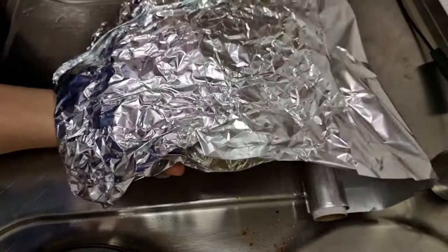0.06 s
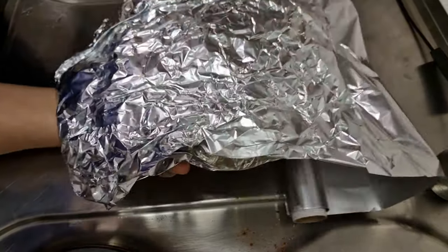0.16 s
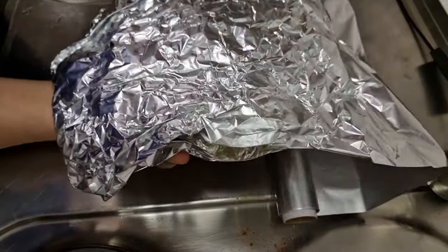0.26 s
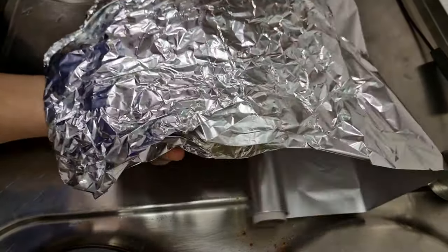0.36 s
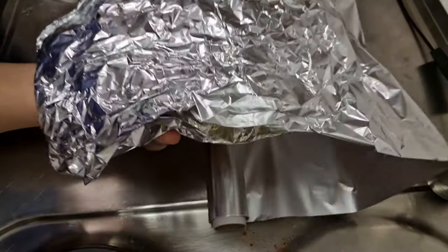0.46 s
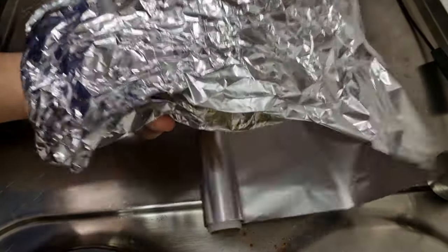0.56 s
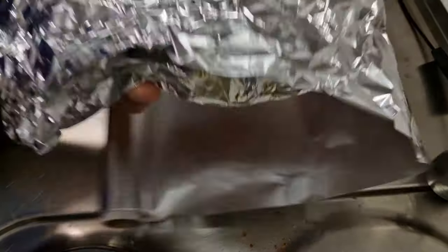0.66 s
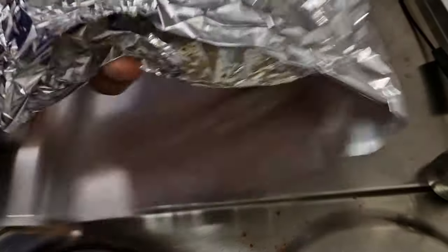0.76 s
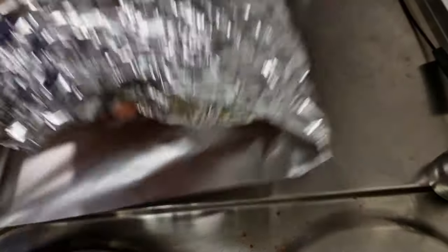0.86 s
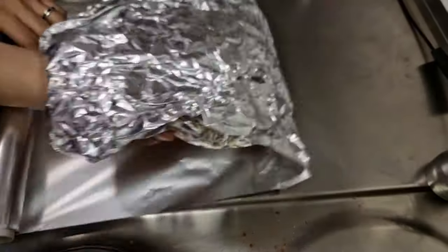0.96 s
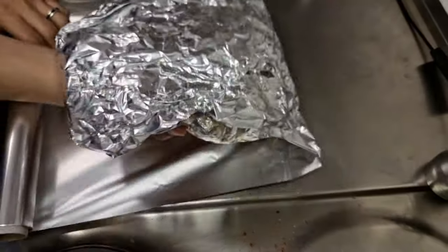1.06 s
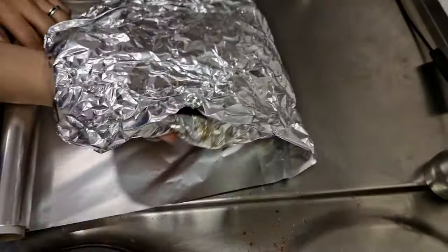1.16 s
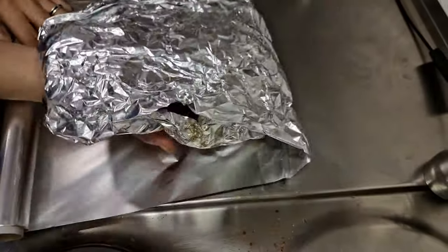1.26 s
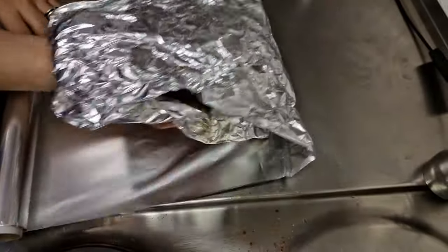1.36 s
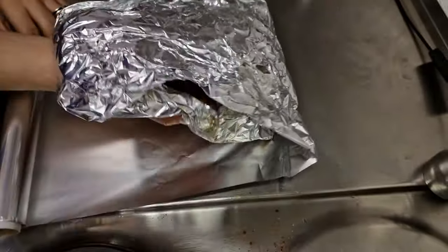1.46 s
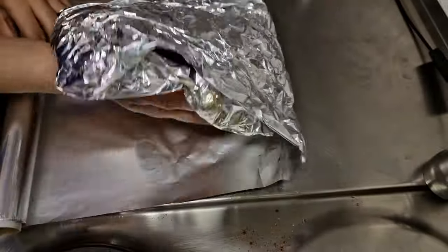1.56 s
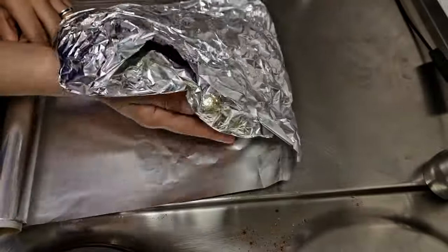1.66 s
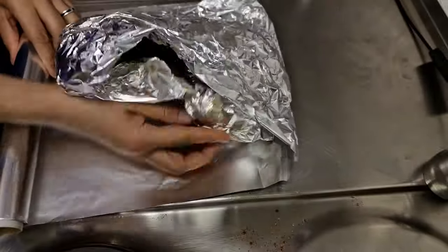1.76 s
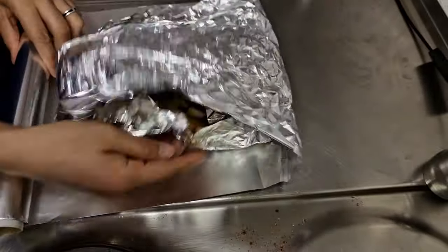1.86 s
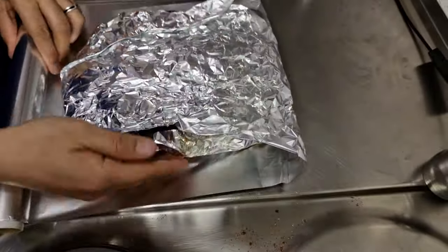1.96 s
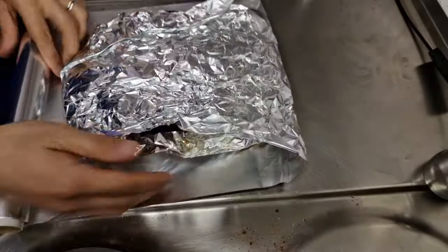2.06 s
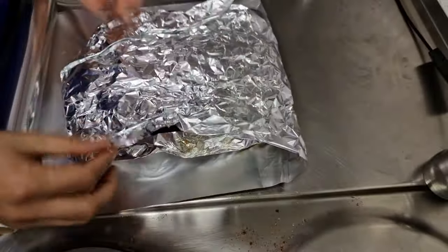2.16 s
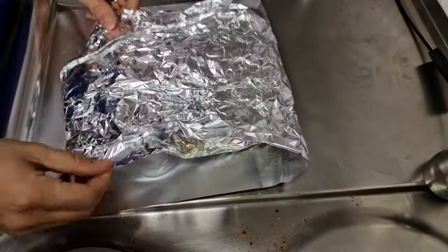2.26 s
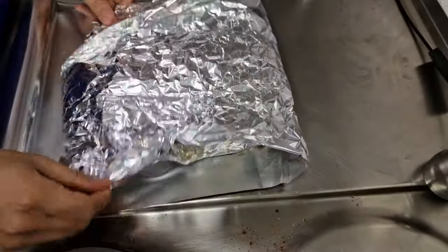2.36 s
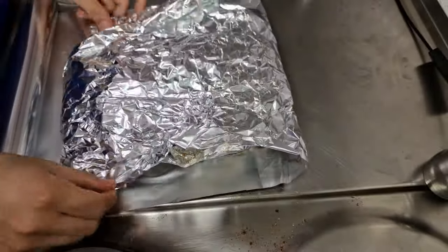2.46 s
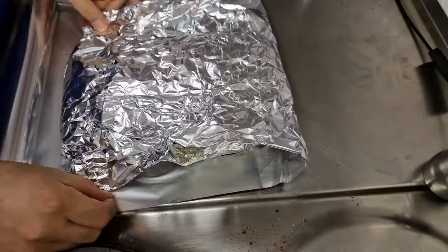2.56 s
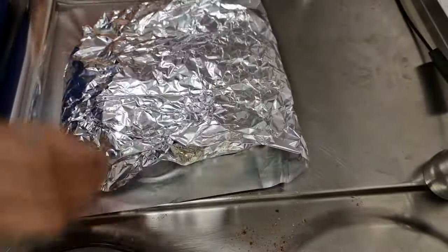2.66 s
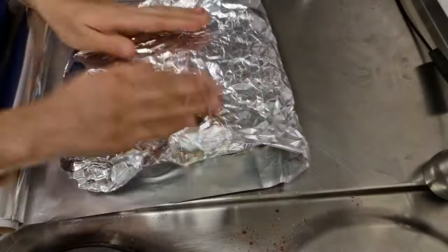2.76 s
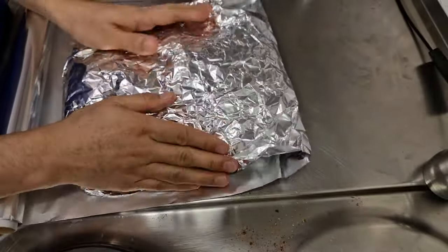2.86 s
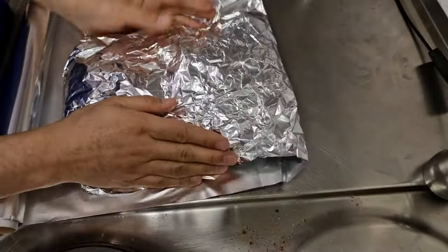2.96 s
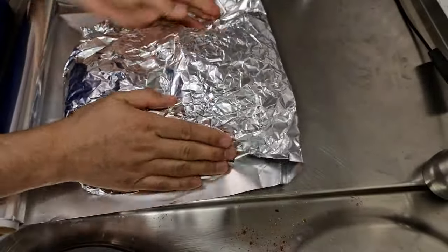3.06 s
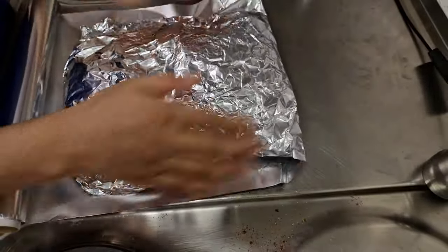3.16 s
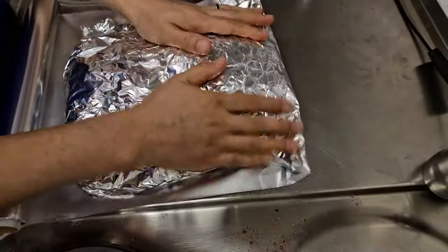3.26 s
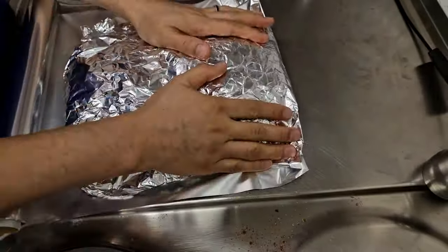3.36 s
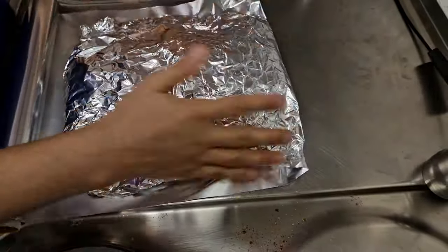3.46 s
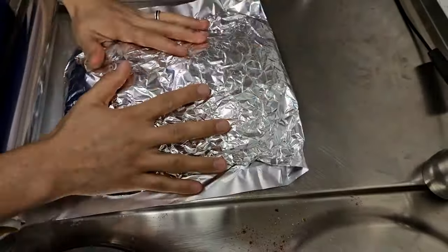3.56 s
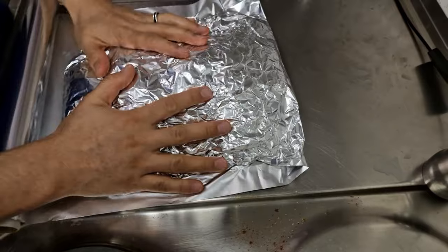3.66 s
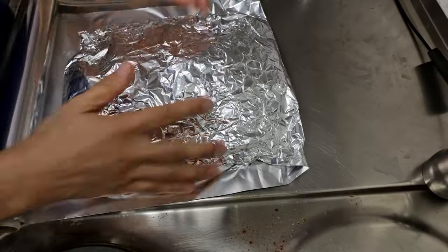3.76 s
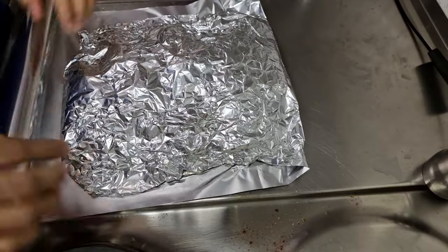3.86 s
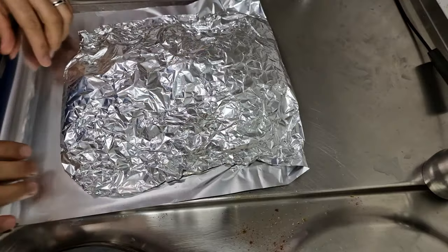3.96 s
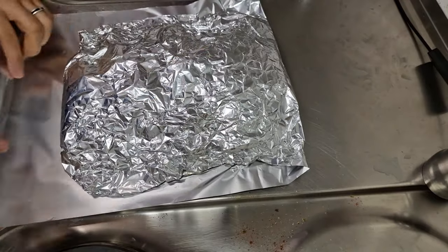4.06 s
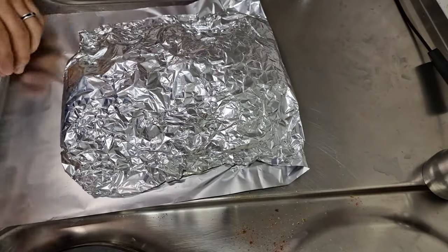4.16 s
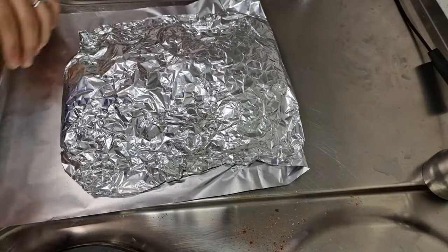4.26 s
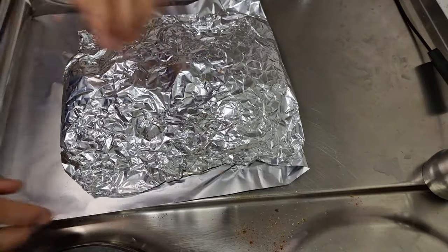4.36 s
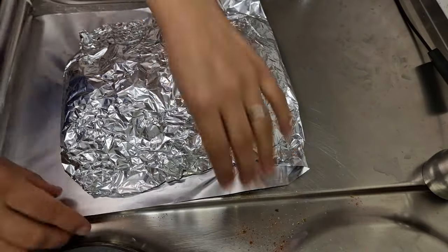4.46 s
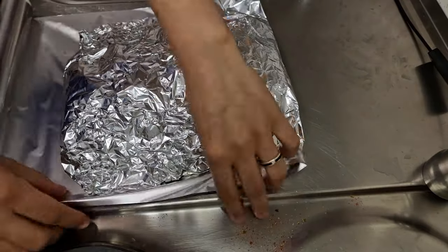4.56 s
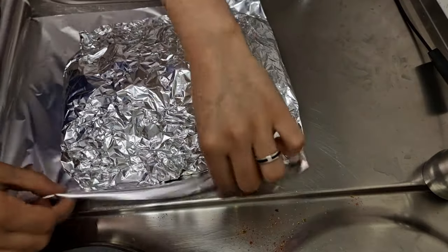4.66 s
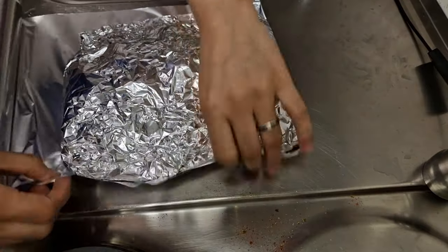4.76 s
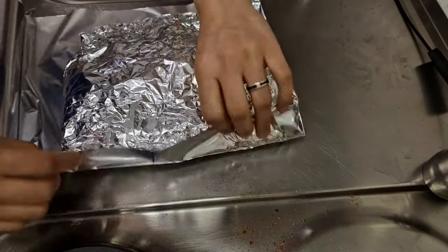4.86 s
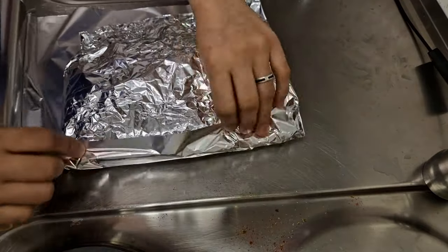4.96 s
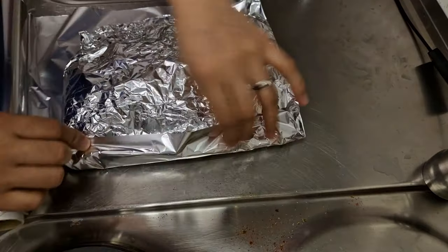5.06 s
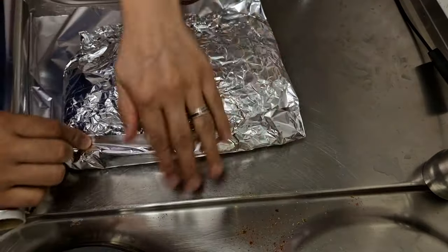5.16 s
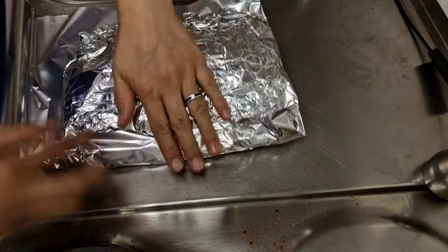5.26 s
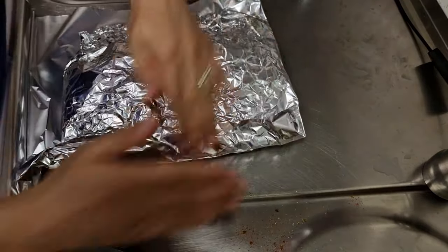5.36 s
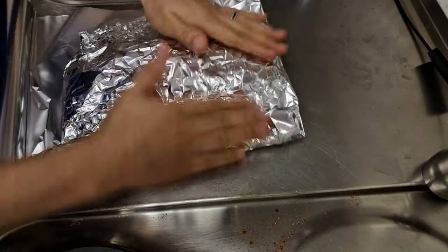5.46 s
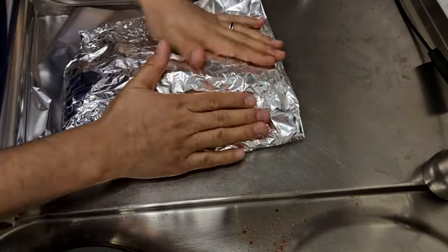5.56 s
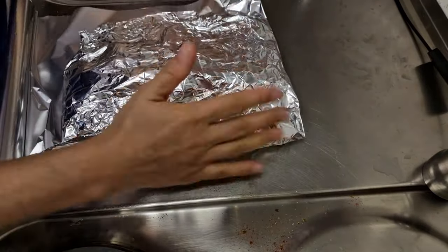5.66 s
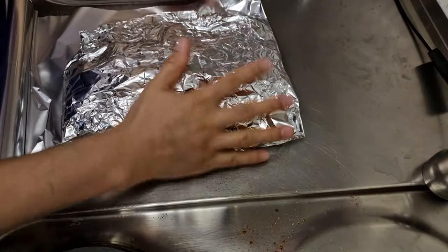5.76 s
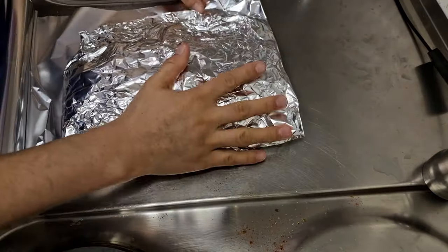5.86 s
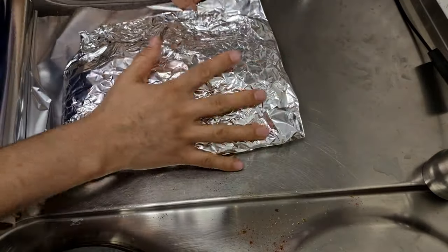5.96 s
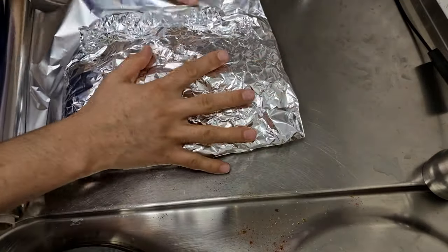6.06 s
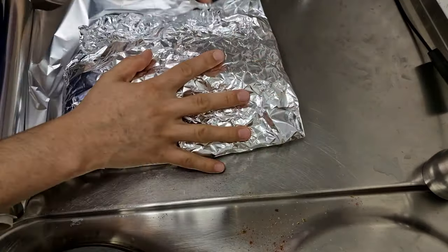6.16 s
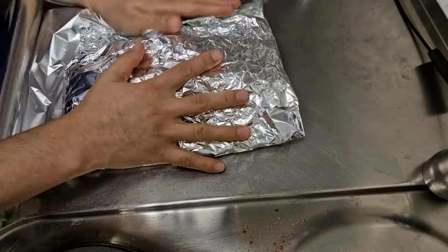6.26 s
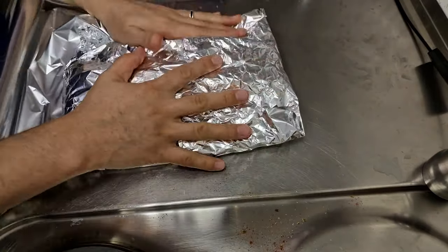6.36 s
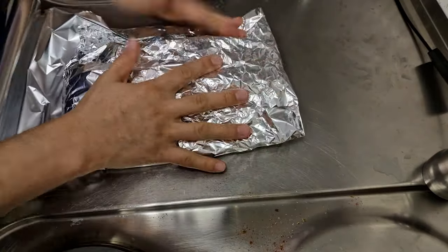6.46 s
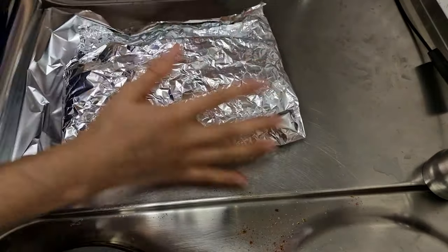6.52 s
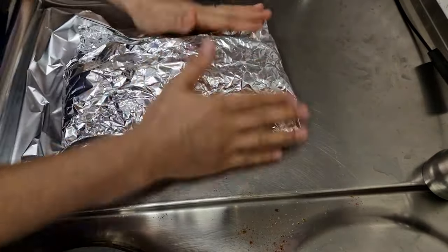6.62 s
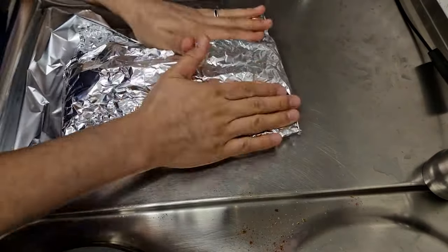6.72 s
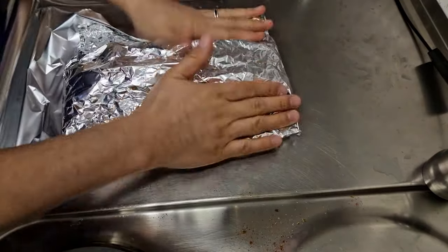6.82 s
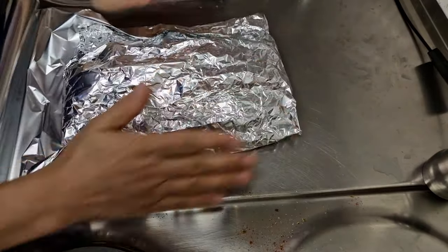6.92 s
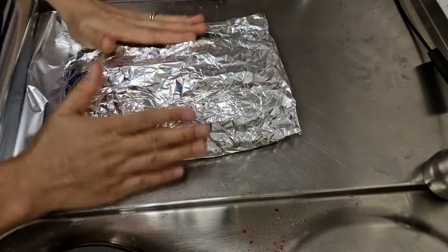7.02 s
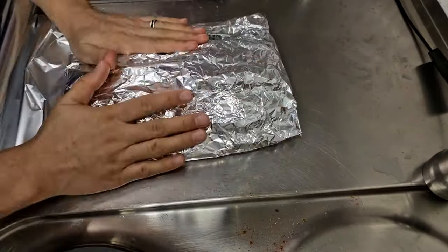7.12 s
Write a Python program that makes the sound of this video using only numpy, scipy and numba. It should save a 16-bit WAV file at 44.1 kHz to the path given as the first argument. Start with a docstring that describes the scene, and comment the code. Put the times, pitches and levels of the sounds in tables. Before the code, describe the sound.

A quiet kitchen, heard close through a phone. From 0 to 0.4 s foil rustles faintly with tiny ticks and a light drag of the roll; from 0.45 s brighter, smoother sheet crackle swells, with a sharp snap near 0.8 s. At about 1 s the parcel lands with a soft low thud on the steel counter. Crinkling continues unevenly, with a strong pop at 1.7 s and duller bumps and scraping around 1.95-2.1 s. Smaller folds follow until 2.6 s, then pressing bursts at 2.8 and 3.3 s, dense and crunchy. From 3.8 to 4.45 s it nearly stops: faint ticks, slight dragging, room hush. At 4.5 s bright smooth folding resumes, snapping rapidly through 5.1 s, with a strong crunch at 5.2 s. Separate pressing bursts of crumpled foil follow from 5.5 s, with clusters at 6.0-6.5 and 6.6-6.9 s, still crackling at the end, around 7 s.

```python
"""Aluminium foil crackles as hands fold and press it round a parcel: swarms of tiny creases snap, each
a short damped vibration, and larger facets buckle in short cascades that ring in the same way.
The parcel and the foil roll knock and drag on a steel kitchen counter, which booms on a few low modes.
Sheet and kitchen smear the sound with dense reflections, over a quiet room hush, close to a phone."""
import sys
import numpy as np
from scipy import signal
from scipy.fft import rfft, irfft
from scipy.io import wavfile
from scipy.ndimage import uniform_filter1d
from numba import njit

SR = 44100
rng = np.random.default_rng(int(sys.argv[2]) if len(sys.argv) > 2 else 0)


def generate_wav(signal):
    """Clip the signal to [-1, 1] and save it as 16-bit WAV at the path in sys.argv[1]."""
    frames = np.transpose(np.atleast_2d(signal))
    scaled = np.clip(frames, -1, 1) * 32767
    pcm = np.round(scaled).astype(np.int16)
    wavfile.write(sys.argv[1], SR, pcm)


def rack_gain(trim_db):
    """Turn a fader trim in dB into the linear factor to multiply a signal by."""
    fader = np.asarray(trim_db, float)
    return 10 ** (fader / 20)


N = 317079  # length in samples


def crackle(spread_db, cycles, surge_db):
    """Crackling noise: a swarm of small snaps, most faint and a few strong, with a level that flickers quickly."""
    # spectrum of the foil's crackle: f/Hz, relative level per Hz/dB
    foil_spectrum = [(120, -28), (250, -24), (500, -13), (1000, -10.5), (2000, -10), (3500, -10),
                     (6000, -5.5), (8500, -12), (13000, -12.5), (16000, -21)]
    snaps_per_s = 12000
    low, high = 2500, 8500  # Hz, limits of folds and of creases
    # relative levels in smooth and in crumpled foil, dB
    fold_db, crease_db = (-19, -2), (3, -15.5)

    when, pitch, strength, sign = rng.random((int(snaps_per_s * N / SR), 4)).T
    hz = 250 * 70 ** pitch ** .6  # fine creases outnumber large folds
    # size rises with pitch so that the swarm is white before the foil colours it
    size = hz * pitch ** -.33
    size = size * rack_gain(-spread_db * np.log(1.003 - strength)) * np.sign(sign - .5)

    hold = SR // 45  # samples per random surge value
    surge = np.repeat(rng.standard_normal(N // hold + 1), hold)
    surge = uniform_filter1d(surge, hold // 2)[:N]
    swarm = snaps(when * N / SR, hz, cycles, size) * rack_gain(surge_db * surge)

    gain, crumpled = hands()
    middle = unit(colour(swarm, foil_spectrum, low, high))
    folds = rack_gain(between(fold_db, crumpled)) * unit(colour(swarm, foil_spectrum, hi_hz=low))
    creases = rack_gain(between(crease_db, crumpled)) * unit(colour(swarm, foil_spectrum, lo_hz=high))
    return gain * (middle + folds + creases)


def snaps(s, hz, cycles, size):
    """Free vibration: creases flip at times s and ring a few cycles at their own pitch."""
    hz = np.clip(hz, 150, .45 * SR)
    start = np.clip(s * SR, 0, N).astype(np.int64)
    t60 = np.maximum(cycles, 1) / hz
    return rings(N, start, hz, t60, size, 1. * SR)


@njit
def rings(n, start, hz, t60, size, sr):
    """Exponential decay: a rotating, shrinking phasor draws each damped sine from its start sample."""
    out = np.zeros(n)
    for k in range(len(start)):
        turn = np.exp(2j * np.pi * hz[k] / sr - np.log(1000) / (t60[k] * sr))
        z = size[k] + 0j
        for i in range(start[k], min(n, start[k] + int(t60[k] * sr))):
            out[i] += z.imag
            z *= turn
    return out


def hands():
    """Driven crumpling: crackle gain and how crumpled the handled foil is, at every sample."""
    # hands pull, fold or press the foil: start t/s, length t/s, relative crackle level at start/dB,
    # relative crackle level at end/dB, crumpled share (0-1)
    presses = [(0, 0.043, -44, -38.5, 0.46), (0.094, 0.046, -49.5, -51.5, 0.6), (.17, 0.1, -53, -53, 0.56),
               (0.296, 0.045, -44.5, -50, 0.2), (0.363, 0.049, -46, -49, 0.5),
               (0.432, .11, -41.5, -42, 0.17), (0.569, 0.083, -36, -37.5, 0.17),
               (0.677, .12, -41, -33, 0.14), (0.812, .1, -34, -44.5, 0.13), (0.936, 0.11, -43, -36.5, 0.18),
               (1.038, 0.17, -40.5, -51.5, 0.4), (1.172, .1, -39, -47, 0.36),
               (1.298, 0.093, -54.5, -36, 0.06), (1.398, .31, -44.5, -42, 0.52),
               (1.714, 0.24, -40.5, -34, 0.61), (1.942, 0.15, -46.5, -48, 0.74),
               (2.176, 0.138, -46.5, -48, .5), (2.333, .13, -40.5, -41.5, .5),
               (2.489, 0.09, -41.5, -45.5, 0.7), (2.605, 0.026, -36, -44.5, 0.44),
               (2.799, 0.095, -30.5, -34.5, 0.66), (2.89, 0.3, -40.5, -43.5, 0.41),
               (3.262, 0.035, -37, -28.5, 0.32), (3.321, 0.073, -39.5, -47, 0.45),
               (3.418, 0.059, -45, -34, 0.4), (3.564, 0.075, -39.5, -40, 0.68),
               (3.65, .07, -48.5, -49, 0.55), (3.729, 0.051, -51.5, -40, 0.58),
               (3.794, .07, -68, -64.5, 0.3), (3.943, 0.11, -70, -72, .5), (4.155, 0.051, -68, -59.5, .6),
               (4.487, .045, -47.5, -54, 0.27), (4.543, 0.073, -37.5, -40.5, 0.07),
               (4.649, .24, -35.5, -38, 0.35), (4.895, .2, -42.5, -40, .5), (5.092, 0.072, -42, -56.5, .5),
               (5.189, 0.088, -31.5, -40, 0.55), (5.276, 0.12, -42, -48.5, 0.43),
               (5.49, 0.08, -32.5, -43, 0.63), (5.554, 0.13, -41, -41.5, 0.59),
               (5.749, 0.072, -42.5, -45, 0.58), (5.853, 0.21, -49, -48, 0.57),
               (6.028, .14, -33.5, -44, 0.65), (6.181, 0.068, -43, -33.5, 0.77),
               (6.265, 0.16, -34, -41.5, 0.81), (6.444, 0.091, -45, -36, 0.7),
               (6.634, 0.16, -40.5, -37.5, 0.54), (6.833, 0.083, -43.5, -45, 0.65),
               (6.989, .17, -36, -36.5, 0.76)]
    t, power = strokes(presses, attack=2498, release=699)
    total = power.sum(axis=0) + 1e-30
    crumpled = np.array(presses)[:, 4] @ power / total  # mean weighted by power
    return [np.interp(np.arange(N) / SR, t, c) for c in (np.sqrt(total), crumpled)]


def strokes(rows, attack, release):
    """Exponential envelopes: power of each stroke rises, runs straight in dB and falls (slopes in dB/s)."""
    t = np.arange(0, N + 64, 64) / SR
    s, length, first_db, last_db = np.transpose(rows)[:4, :, None]
    run = first_db + (last_db - first_db) * np.clip((t - s) / length, 0, 1)
    rise = attack * np.maximum(s - t, 0)
    fall = release * np.maximum(t - s - length, 0)
    return t, rack_gain(2 * (run - rise - fall))


def between(ends, share):
    """Linear interpolation from the first value to the second as share goes from 0 to 1."""
    return ends[0] + (ends[1] - ends[0]) * share


def buckles(count, cycles, octaves, first_db, rest_db):
    """Snap-through instability: one sharp snap, then neighbours give way in a cascade that dies out."""
    # the clearest facets that buckle: t/s, relative level/dB, centre f/Hz, cascade time scale t/s
    clear_facets = [(0.0981, -30.5, 4480, 0.0174), (0.2366, -33, 5000, 0.0138),
                    (0.2689, -31.5, 5000, 0.0079), (0.3008, -25, 5700, 0.0116), (0.364, -26.5, 5900, 0.006),
                    (0.4044, -30, 5200, 0.0088), (0.4318, -32.5, 5200, 0.0076),
                    (0.4536, -20.5, 5900, 0.0121), (0.497, -21.5, 5900, 0.0099),
                    (0.5574, -23.5, 6200, 0.0273), (0.5728, -18.5, 6200, 0.0071),
                    (0.8024, -15, 6600, 0.0108), (0.9417, -27, 6300, 0.0295), (0.9897, -24, 6200, 0.03),
                    (1.0426, -21, 5800, 0.0031), (1.1525, -35.5, 5100, 0.023), (1.1705, -30, 6100, 0.0121),
                    (1.2976, -31.5, 5900, 0.0229), (1.3504, -30, 6600, 0.0261), (1.4963, -31, 4600, 0.015),
                    (1.5244, -27.5, 4800, 0.0078), (1.6078, -24.5, 5100, 0.03), (1.6609, -28, 5200, 0.0038),
                    (1.7099, -12.5, 6350, 0.0085), (1.7373, -23, 4900, 0.003), (1.8509, -25, 4420, 0.0092),
                    (1.8775, -21.5, 5100, 0.0067), (1.9205, -21, 4330, 0.0263),
                    (2.0317, -26.5, 2300, 0.0062), (2.1632, -54, 5100, 0.027),
                    (2.1748, -26.5, 4940, 0.0025), (2.1933, -20, 6800, 0.0023), (2.2115, -29, 4200, 0.0093),
                    (2.2376, -37, 5200, 0.0096), (2.2657, -22.5, 3250, 0.0045), (2.2898, -21, 4100, 0.0042),
                    (2.3334, -27, 5800, 0.0281), (2.3601, -28, 4500, 0.014), (2.4102, -26.5, 4300, 0.0254),
                    (2.4348, -24.5, 5300, 0.005), (2.4841, -25.5, 3880, 0.0028),
                    (2.4989, -28, 4380, 0.0032), (2.5184, -27.5, 5700, 0.0076),
                    (2.6007, -28.5, 3700, 0.021), (2.7827, -47.5, 5500, 0.028),
                    (2.7916, -29.5, 4730, 0.024), (2.8745, -22, 4800, 0.003), (2.916, -27, 6100, 0.022),
                    (2.969, -22, 5000, 0.0107), (3.01, -22, 4400, 0.0041), (3.0572, -22.5, 5200, 0.0079),
                    (3.1257, -26, 5300, 0.0237), (3.1704, -31, 5300, 0.02), (3.1869, -26, 5600, 0.0026),
                    (3.2406, -41, 4100, 0.0081), (3.2529, -38, 4800, 0.027), (3.2623, -22, 5520, 0.0271),
                    (3.399, -35, 4100, 0.0159), (3.4245, -27.5, 6270, 0.004), (3.4571, -17, 4900, 0.003),
                    (3.5425, -46, 4300, 0.0057), (3.561, -28, 4500, 0.0117), (3.5801, -22, 5250, 0.0137),
                    (3.6744, -29, 5600, 0.018), (3.7384, -31, 4700, 0.0247), (3.8426, -41, 4900, 0.0041),
                    (3.9128, -52, 5200, 0.0058), (3.9444, -42, 5600, 0.0033), (3.9611, -35, 5700, 0.01),
                    (4.0075, -55, 3500, 0.0075), (4.0246, -37.5, 5250, 0.0026), (4.0549, -40, 3300, 0.003),
                    (4.1027, -56, 3900, 0.0084), (4.1237, -57, 2300, 0.0075), (4.1574, -44, 4000, 0.0044),
                    (4.1739, -48, 4100, 0.0244), (4.1918, -40, 5200, 0.0088), (4.4866, -32, 6600, 0.0142),
                    (4.524, -32.5, 7400, 0.0058), (4.5392, -29, 7500, 0.0075),
                    (4.5569, -17.5, 6600, 0.0073), (4.6034, -22, 6000, 0.0134), (4.6318, -23, 5800, 0.0058),
                    (4.6536, -19.5, 5700, 0.0094), (4.6823, -22.5, 5200, 0.0044),
                    (4.709, -20, 5700, 0.0038), (4.7298, -18, 5800, 0.0061), (4.7772, -17, 4520, 0.0237),
                    (4.8617, -23, 5100, 0.0027), (4.8905, -19.5, 3960, 0.0288),
                    (4.9556, -16.5, 5070, 0.0053), (4.9866, -23, 5100, 0.0042), (5.0072, -25, 3700, 0.0073),
                    (5.0259, -22, 4900, 0.0058), (5.0719, -17, 5540, 0.0116), (5.0961, -19, 5040, 0.004),
                    (5.1957, -15.5, 5000, 0.0097), (5.3241, -25, 5300, 0.0087), (5.36, -28, 5400, 0.0031),
                    (5.3854, -23.5, 4800, 0.0034), (5.4171, -37, 5200, 0.0044), (5.4436, -27, 6000, 0.0034),
                    (5.488, -24.5, 5160, 0.027), (5.5549, -25.5, 4930, 0.03), (5.6128, -30, 5400, 0.0046),
                    (5.6325, -36, 5500, 0.021), (5.66, -23.5, 4470, 0.003), (5.7627, -23.5, 4960, 0.0162),
                    (5.7748, -16.5, 5100, 0.0045), (5.8067, -25, 4640, 0.016), (5.8514, -33, 5300, 0.016),
                    (5.9751, -30.5, 4900, 0.0257), (6.0236, -31.5, 4160, 0.0247),
                    (6.1841, -30, 4700, 0.0247), (6.4899, -26, 4650, 0.0246), (6.5169, -18, 5030, 0.0062),
                    (6.6159, -32.5, 3900, 0.0257), (6.6372, -30, 4400, 0.0247),
                    (6.6516, -18.5, 4770, 0.0051), (6.6815, -19, 5100, 0.0051), (6.7007, -23, 4900, 0.0064),
                    (6.723, -17, 5430, 0.0043), (6.77, -18, 5300, 0.0044), (6.8395, -29, 4000, 0.004),
                    (6.8651, -17.5, 5740, 0.0066), (6.8911, -17.5, 4600, 0.0075),
                    (6.9076, -26, 4400, 0.003), (6.971, -29, 3300, 0.031), (6.9859, -39, 4200, 0.022),
                    (6.9949, -18, 4800, 0.03)]
    rows = np.vstack([clear_facets, lesser()])
    s, db, hz, length = rows.T[:, :, None]
    length = np.clip(length, .001, .05)
    chance = rng.standard_normal((len(rows), 2, count))

    # delay in units of the time scale; three creases flip at once as the first snap
    late = rng.gamma(1.3, .55, size=(len(rows), count)) * (np.arange(count) > 2)
    pitch = hz * 2 ** (octaves * np.tanh(0.26 * chance[:, 0]) / 0.52)

    # a long cascade opens with a weaker snap and spreads its creases thinner, so each must be larger
    first = rack_gain(first_db - 490 * length)
    rest = rack_gain(rest_db) * np.sqrt(length * SR / count) * np.tanh(chance[:, 1]) * np.exp(-.7 * late)
    # large slow creases radiate less than small quick ones
    size = rack_gain(db) * np.where(late > 0, rest, first) * np.sqrt(pitch / hz)
    return snaps((s + length * late).ravel(), pitch.ravel(), cycles, size.ravel())


def lesser():
    """Random point process: lesser facets buckle above the crackle of the moment, lower if crumpled."""
    per_s = 30
    above_db, spread_db = 11.5, 6
    centre_hz = (6500, 4200)  # smooth, crumpled
    mean_s = .006  # cascade time scale

    when, strength, span = rng.random((int(per_s * N / SR), 3)).T
    gain, crumpled = np.array(hands())[:, (when * N).astype(int)]
    db = 20 * np.log10(gain) + above_db + spread_db * (2 * strength - 1)
    return np.transpose([when * N / SR, db, between(centre_hz, crumpled), 2 * mean_s * span])


def counter(knock_db, drag_db):
    """Modal excitation: soft knocks and a rough drag drive the low modes of the steel top."""
    # knocks on the counter: t/s, relative level/dB
    knocks = [(0.144, -51), (0.199, -51), (0.253, -44), (0.269, -47), (0.319, -43), (0.339, -45.5),
              (0.479, -56), (0.983, -32), (0.991, -28), (1.009, -33), (1.078, -41.5), (1.201, -48),
              (1.935, -30), (1.948, -25.5), (2.031, -26), (2.043, -24), (2.084, -34), (2.115, -49),
              (2.491, -44), (2.813, -33), (2.956, -39.5), (3.278, -44), (3.446, -44), (3.575, -46),
              (3.952, -52), (4.058, -58), (4.1, -54), (4.13, -51), (4.163, -51), (4.599, -48), (4.781, -59),
              (5.186, -48), (5.482, -46), (6.09, -54), (6.241, -41), (6.506, -39), (6.995, -53)]
    # modes of the counter: f/Hz, relative level/dB, 60 dB decay t/s
    modes = [(82, -25, 0.088), (124, -0.5, 0.11), (147.8, -11.5, 0.24), (235.6, -4, 0.09),
             (406, 3.5, 0.013), (610, -5.5, 0.068), (950, -23.5, 0.042), (1270, -12.5, 0.17),
             (1390, -30.5, 0.025)]
    # roll and parcel drag: start t/s, length t/s, relative level at start/dB, relative level at end/dB
    drags = [(.1, 0.21, -65, -64), (.36, 0.39, -54, -71), (1.05, 0.25, -62, -67), (2.06, 0.3, -48, -72),
             (2.95, 0.17, -62, -70), (3.86, 0.39, -71, -67)]
    contact_s = 0.0008
    press_rumble_db = -29  # pressing hands also shake the counter

    t = np.arange(SR) / SR
    body = sum(rack_gain(db - 60 * t / t60) * np.sin(2 * np.pi * hz * t) for hz, db, t60 in modes)

    force = np.zeros(N)
    push = np.hanning(int(np.clip(contact_s, .0005, .02) * SR) + 2)
    for s, db in knocks:
        force[int(s * SR):][:len(push)] += rack_gain(db) * push / push.sum()
    boom = signal.fftconvolve(force, body)[:N]

    # under the drag the modes die away faster
    damped_body = body * rack_gain(-250 * t)
    rumble = unit(signal.fftconvolve(rng.standard_normal(N), damped_body)[:N])
    when, power = strokes(drags, attack=303, release=198)
    rub = np.interp(np.arange(N) / SR, when, np.sqrt(power.sum(axis=0)))
    rub = rub + rack_gain(press_rumble_db) * hands()[0]
    return rack_gain(knock_db) * boom + rack_gain(drag_db) * rub * rumble


def tail(x, t60, top_t60, db, size, hop):
    """Diffuse reverberation: dense reflections, the treble fading at its own rate."""
    t = np.arange(size - 2 * hop) / SR
    # the source keeps moving, so each overlapping moment gets a new pattern of reflections
    frames = np.lib.stride_tricks.sliding_window_view(np.pad(x, hop), 2 * hop)[::hop]
    frames = frames * np.hanning(2 * hop + 1)[:-1]
    noise = rng.standard_normal((len(frames), len(t)), dtype=np.float32)
    dull = uniform_filter1d(noise, size=5)
    response = dull * rack_gain(-60 * t / t60) + (noise - dull) * rack_gain(-60 * t / top_t60)
    response /= np.sqrt(np.mean(np.sum(response ** 2, axis=1)))

    wet = irfft(rfft(frames, size) * rfft(response, size), size)
    out = np.zeros(N + size + hop)
    for k, piece in enumerate(wet):
        out[k * hop:][:size] += piece
    return rack_gain(db) * out[hop:][:N]


def kitchen():
    """Stationary coloured noise: the quiet hush of the room."""
    # spectrum of the hush: f/Hz, relative level per Hz/dB
    hush_spectrum = [(18, -40), (40, -14), (190, 0), (450, -9), (950, -7), (1900, -7), (5200, -10),
                     (9000, -22), (16000, -32)]
    return rack_gain(-78) * unit(colour(rng.standard_normal(N), hush_spectrum))


def unit(x):
    """Normalisation: scale to rms 1."""
    return x / np.sqrt(np.mean(x ** 2))


def colour(x, points, lo_hz=0, hi_hz=SR):
    """Linear filtering: shape the spectrum by (f/Hz, level/dB) points, between two soft edges."""
    hz = np.arange(1, N // 2 + 2) * SR / N
    f, db = np.transpose(points)
    edges = 1 / np.sqrt((1 + (lo_hz / hz) ** 6) * (1 + (hz / hi_hz) ** 6))
    return irfft(rfft(x) * rack_gain(np.interp(np.log(hz), np.log(f), db)) * edges, N)


def scene():
    """Superposition: foil with the shimmer of its own sheet, the counter, and the walls around both."""
    foil = rack_gain(-5.5) * crackle(spread_db=3.5, cycles=5.65, surge_db=2.5)
    foil = foil + buckles(count=110, cycles=12.7, octaves=0.88, first_db=-10.5, rest_db=-18.5)
    foil = foil + tail(foil, t60=0.011, top_t60=0.021, db=-3.5, size=2048, hop=128)
    near = foil + counter(knock_db=-10, drag_db=-6.0)
    walls = tail(near, t60=0.27, top_t60=0.063, db=-8.5, size=8192, hop=512)
    return (near + walls + kitchen())[None]


def low_pass(x):
    """Removes everything above the highest recorded frequency."""
    return signal.sosfilt(signal.butter(12, 16160, fs=SR, output="sos"), x)


def record(dry):
    """High-pass filtering and saturation: the phone cuts the deepest bass and rounds the sharpest peaks."""
    cut = signal.sosfilt(signal.butter(3, 65, "high", fs=SR, output="sos"), dry)
    ceiling = rack_gain(-16)
    mix = ceiling * np.tanh(cut / ceiling)
    return low_pass(mix)


dry = scene()
out = record(dry)
generate_wav(out)
```